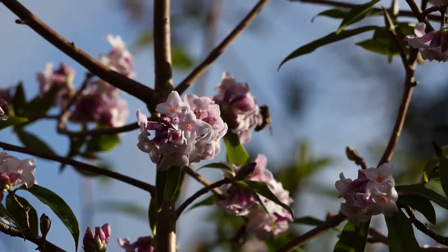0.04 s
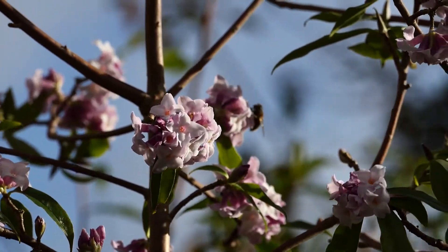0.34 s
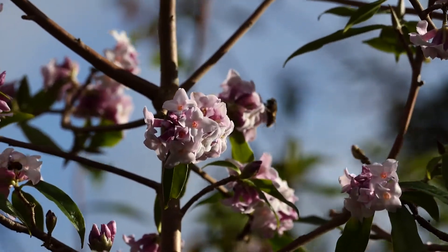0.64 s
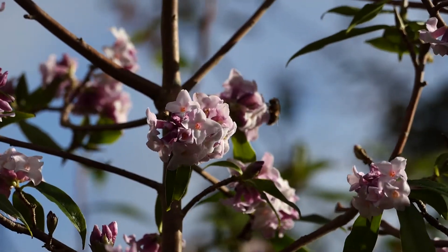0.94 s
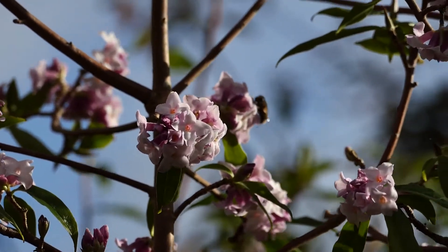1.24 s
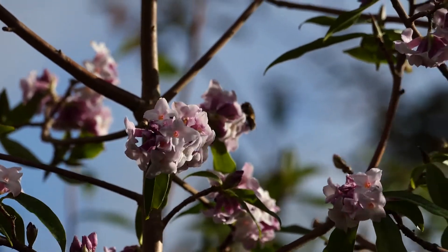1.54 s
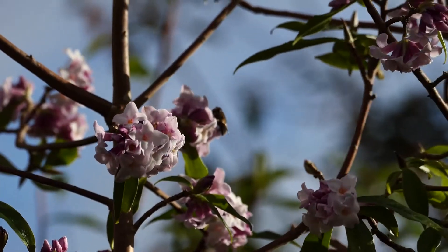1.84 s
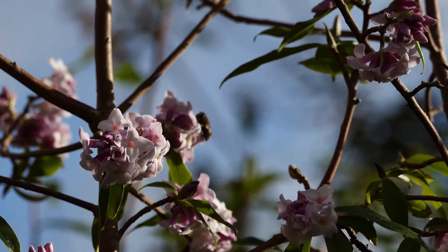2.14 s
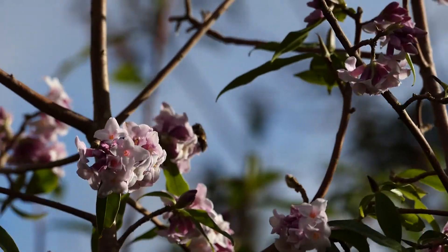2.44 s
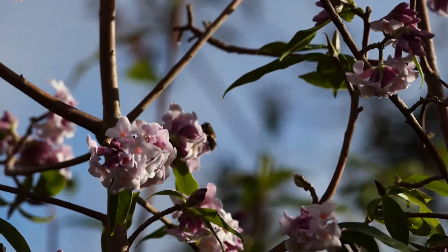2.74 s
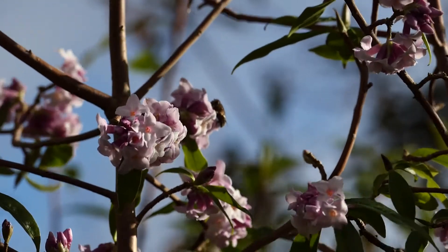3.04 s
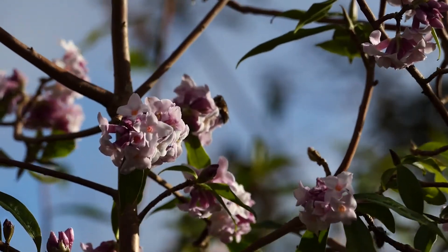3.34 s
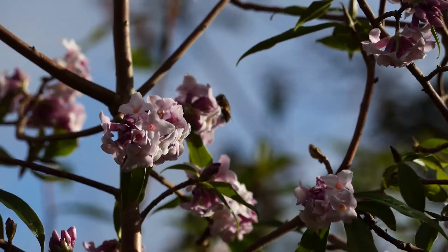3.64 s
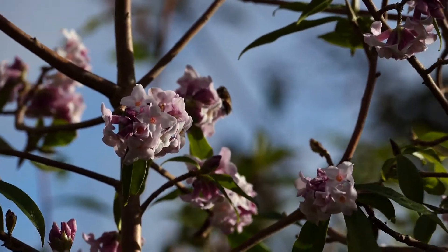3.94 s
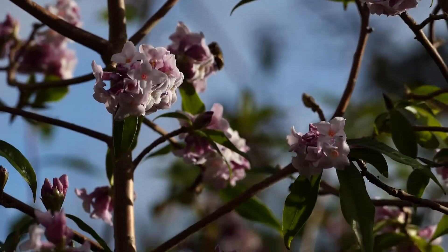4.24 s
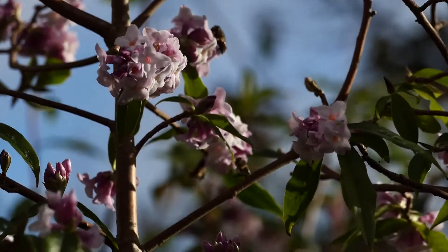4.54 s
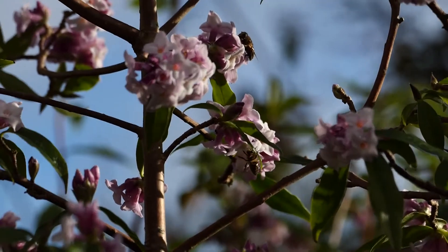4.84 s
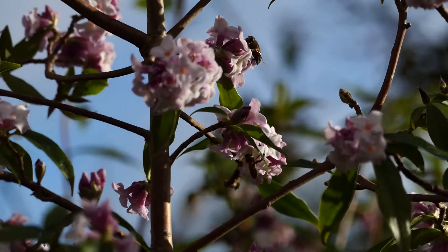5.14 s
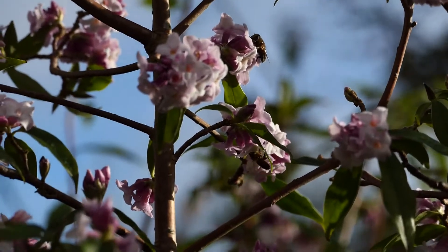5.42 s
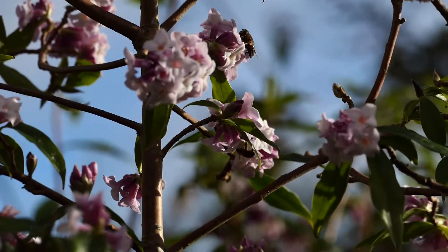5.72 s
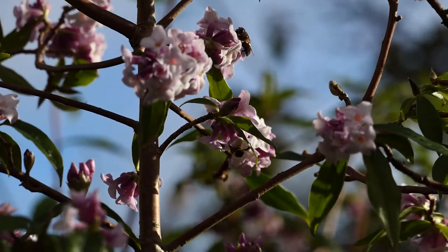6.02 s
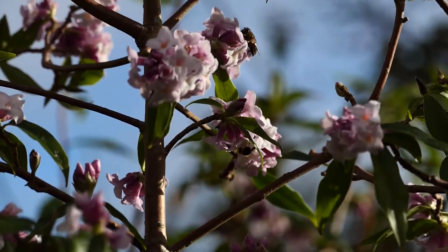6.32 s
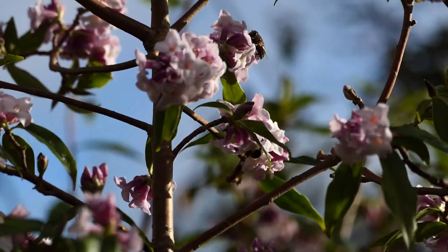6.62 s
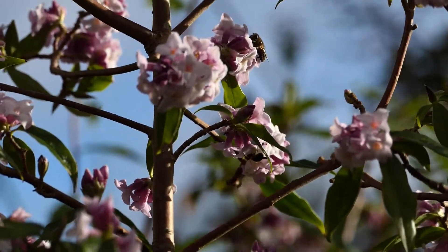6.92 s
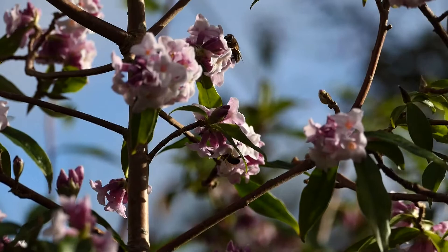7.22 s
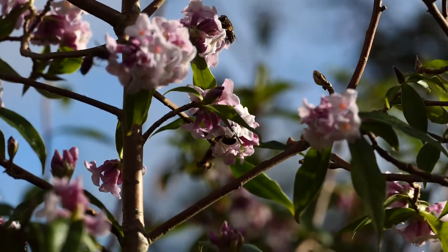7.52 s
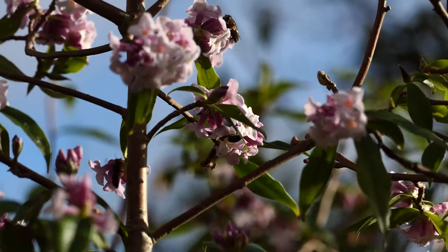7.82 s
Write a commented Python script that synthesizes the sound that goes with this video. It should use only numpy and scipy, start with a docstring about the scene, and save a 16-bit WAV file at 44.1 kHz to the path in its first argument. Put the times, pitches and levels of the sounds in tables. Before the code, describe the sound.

Strong gusts thump and rumble on the microphone in a garden for about two seconds, then drop to a light breeze. A bumblebee drones briefly past, and honeybees hum softly around a flowering shrub, single ones buzzing out of the hum. A small distant bird gives a short high chirp about every two seconds. Twigs tick faintly close by over a dull outdoor rush, and light wind bumps return near the end.

```python
"""Wind thumps on the microphone for the first two seconds, and the limiter ducks the whole garden under
the strongest gusts. As it drops to a breeze, honeybees are heard working a flowering shrub: many
wingbeats merge into a soft hum, single bees stand out of it and a bumblebee drones past.
A small bird repeats an arched two-voiced chirp; twigs tick and leaves brush faintly close by.
Behind it all lie the hiss of foliage and the far outdoor rush."""
import sys
import numpy as np
from scipy import signal
from scipy.fft import rfft, irfft, next_fast_len
from scipy.io import wavfile
from scipy.ndimage import uniform_filter1d, minimum_filter1d

SR = 44100
rng = np.random.default_rng(int(sys.argv[2]) if len(sys.argv) > 2 else 0)


def put_to_file(sound):
    """Save the sound as 16-bit audio at rate SR, in the file named by the first command-line argument."""
    columns = np.atleast_2d(sound).T  # one column per channel
    safe = np.clip(columns, -1, 1)
    whole_steps = np.round(safe * 32767)
    wavfile.write(sys.argv[1], SR, whole_steps.astype(np.int16))


N = 351477
TIME = np.arange(N) / SR


# hum from the shrub, as it reaches the microphone: (time [s], level [dB])
SWARM_LEVEL = [(0, -43), (.4, -42.5), (.9, -45), (1.85, -46), (2.05, -42), (2.6, -42), (3.1, -46),
               (3.55, -41), (4.7, -40.5), (5.45, -42), (7.97, -40.5)]
# how far the wingbeats in the shrub lie apart: (time [s], spread [share of the wingbeat])
WINGBEAT_SPREAD = [(0, .036), (4.7, .034), (6.5, .048)]
# tone of a honeybee's wing stroke: (harmonic [number], relative level [dB])
HONEYBEE_TONE = [(1, -2), (2, 1), (3, -6), (4, -11), (5, -9), (6, -11), (7, -13), (8, -22), (9, -23),
                 (10, -25.5)]

def honeybees(count=16, wingbeat_hz=243):
    """Each bee has its own wingbeat, which wanders as it manoeuvres; its buzz swells as it turns."""
    hum_db, = in_time(SWARM_LEVEL)
    spread, = in_time(WINGBEAT_SPREAD)
    hum = np.zeros(N)
    for own_offset in np.linspace(-1, 1, count):
        detune = .7 * own_offset + .7 * drift(1.5) + .45 * drift(10.01)
        hum += from_db(1.45 * drift(1.55)) * buzz(wingbeat_hz * (1 + spread * detune), HONEYBEE_TONE)
    return from_db(hum_db) * evened(rms_one(hum), seconds=.13)


# single bees and smaller, faster fliers hopping from flower to flower:
# (time [s], half length [s], wingbeat [Hz], level [dB], overtone boost [dB])
FLOWER_HOPS = [(2.1, .11, 334, -45.5, -14), (2.1, .09, 245, -47, 7), (2.496, .24, 242, -45.5, -4),
               (3.56, .12, 240, -46, 3), (4.048, .22, 246, -44.5, -3), (4.63, .1, 240, -42.5, 5),
               (4.947, .11, 242, -43, -3), (5.063, .055, 228, -45.5, 4), (5.7, .12, 249, -46, 0),
               (6.24, .26, 355, -47.5, -9), (6.618, .12, 254, -48, 0), (7.794, .088, 233, -43.5, 0)]
# their soft wing stroke: (harmonic [number], relative level [dB])
HOP_TONE = [(1, 0), (2, 0), (3, -19), (4, -19)]

def hopping_bees(wander=.012):
    """A bee lifts off, hums clear of the swarm and lands; some face the microphone and buzz brighter."""
    out = np.zeros(N)
    for s, half_length, beat_hz, level_db, overtones_db in FLOWER_HOPS:
        flight = from_db(level_db + 1.9 * drift(12)) * bell_curve(s, half_length)
        tone = [(k, db + overtones_db * (k > 1)) for k, db in HOP_TONE]
        out += flight * buzz(beat_hz * (1 + wander * drift(7.1)), tone)
    return out


# one bee swerving closer to the microphone: (time [s], wingbeat [Hz], level [dB])
NEAR_BEE_FLIGHT = [(2.6, 280.5, -56), (2.82, 284.4, -41.5), (3.2, 258, -50), (3.6, 242.8, -41),
                   (4.4, 240, -55), (5.4, 237.2, -60), (5.6, 240, -75)]
# its raspier wing stroke at close range: (harmonic [number], relative level [dB])
NEAR_BEE_TONE = [(1, -10), (2, -5), (3, -4), (4, -7), (5, -10), (6, -14), (7, -26.5), (8, -19)]

def near_bee(flutter=.045):
    """Its wings flutter as it steers, race in the swerve, then settle to the pace of the others."""
    beat_hz, level_db = in_time(NEAR_BEE_FLIGHT)
    gain = from_db(level_db + 2.1 * drift(7.3))
    return gain * buzz(beat_hz * (1 + flutter * drift(25)), NEAR_BEE_TONE)


# a bumblebee droning past the microphone: (time [s], wingbeat [Hz], level [dB])
BUMBLEBEE_FLIGHT = [(1.87, 146.4, -57), (2.0, 148.6, -37.5), (2.12, 146.2, -38.5), (2.2, 152, -51),
                    (2.4, 160, -79)]
# its rounder wing stroke: (harmonic [number], relative level [dB])
BUMBLEBEE_TONE = [(1, 1), (2, -16), (3, -15)]

def bumblebee(wander=.0276):
    """A heavier body beats its wings more slowly."""
    beat_hz, level_db = in_time(BUMBLEBEE_FLIGHT)
    gain = from_db(level_db + 2.8 * drift(33))
    return gain * buzz(beat_hz * (1 + wander * drift(17)), BUMBLEBEE_TONE)


def buzz(beat_hz, tone):
    """One wing stroke repeated at the wingbeat rate; rms 1."""
    cycle = np.linspace(0, 1, 513)
    stroke = sum(from_db(db) * np.sin(2 * np.pi * (k * cycle + rng.random())) for k, db in tone)
    return np.interp(np.cumsum(beat_hz) / SR % 1, cycle, rms_one(stroke))


# wind right on the microphone, strong at first, then a light breeze: (time [s], strength [dB])
WIND_STRENGTH = [(0, -14), (.42, -14), (.6, -13), (.9, -13), (1.1, -18), (1.3, -13), (1.48, -22),
                 (1.62, -24), (1.98, -23.5), (2.1, -31.5), (2.6, -42.5), (4.9, -48), (5.65, -33),
                 (6.15, -40), (7.15, -35.5), (7.5, -29.5), (7.9, -28.5)]
# large, middling and small eddies at its ports: (frequency [Hz], relative density [dB])
LARGE_EDDIES = [(12, 12.5), (22, 13.5), (35, 11.5), (50, -12), (65, -6)]
MIDDLING_EDDIES = [(35, -18), (58, 4), (75, -2.5), (100, -8.5), (135, -23)]
SMALL_EDDIES = [(80, -14.5), (120, 6.5), (165, -2.5), (240, -13), (400, -21.5)]

def wind():
    """One wind drives all eddies: large ones thump on both ports alike, small ones flutter a bit apart."""
    wind_db, = in_time(WIND_STRENGTH)
    thumps = from_db(wind_db + 2) * evened(noise(LARGE_EDDIES), seconds=.041)
    rumble = from_db(1.056 * wind_db - 5) * evened(noise(MIDDLING_EDDIES), seconds=.045)
    flutter = from_db(.86 * wind_db - 23.5) * evened(wide_noise(SMALL_EDDIES), seconds=.17)
    return thumps + rumble + flutter


# single gusts striking the microphone, ahead of the limiter:
# (time [s], swirl peak [dB], build-up [s], swirl rate [Hz], flutter level [dB])
MIC_GUSTS = [(.048, 0, .024, 33, -28), (.23, -12, .028, 24, -25), (.41, -7, .015, 48, -31),
             (.466, -3, .022, 23, -24), (.513, 10.5, .02, 21, -29), (.64, -12, .02, 50, -27),
             (.755, -9, .022, 42, -21), (.853, 9, .018, 24, -28), (.945, -7, .028, 55, -12.5),
             (.99, 8, .015, 32, -17), (1.29, -10, .055, 55, -20), (1.368, -5, .022, 42, -18.5),
             (1.408, 5, .013, 25, -28), (1.55, -22, .018, 65, -31), (1.73, -23, .026, 62, -26),
             (1.815, -21, .022, 55, -28), (1.96, -20, .045, 40, -45), (2.74, -30, .026, 38, -50),
             (4.6, -31, .06, 17, -52), (5.0, -34, .035, 25, -54), (5.62, -27, .04, 35, -46),
             (5.76, -25, .035, 30, -48), (6.31, -27, .04, 24, -48), (6.68, -17.5, .036, 31, -38),
             (6.835, -25, .025, 33, -46), (7.03, -26, .04, 26, -48), (7.5, -24, .05, 30, -42),
             (7.79, -21.5, .05, 36, -36)]
# the flutter they shed at the ports: (frequency [Hz], relative density [dB])
GUST_SPECTRUM = [(85, 5.5), (125, 4.5), (200, -6.5), (290, -19.5), (450, -28)]

def gusts(wander=.3, fall_share=.55):
    """A gust is one big swirl that builds up, shedding flutter, and collapses after its hardest push."""
    out = np.zeros((2, N))
    flutter = evened(wide_noise(GUST_SPECTRUM), seconds=.041)
    swirl_time = np.cumsum(1 + wander * drift(21)) / SR  # an uneven clock makes the swirl waver
    for s, peak_db, build_up, hz, flutter_db in MIC_GUSTS:
        swirl = np.cos(2 * np.pi * hz * (swirl_time - np.interp(s, TIME, swirl_time)))
        half_length = build_up * np.where(TIME < s, 1, fall_share)
        out += bell_curve(s, half_length) * (from_db(peak_db) * swirl + from_db(flutter_db) * flutter)
    return out


# a small bird heard through the foliage: (time of the arch's top [s], upper voice top [Hz],
# main voice top [Hz], stretch [factor], upper voice stress on rise [dB], on fall [dB],
# main voice stress on rise [dB], at top [dB], on fall [dB])
BIRD_CHIRPS = [(.346, 4550, 4450, 1.1, -45.5, -51, -45, -57, -41.5),
               (1.966, 4620, 4230, .85, -47, -45.5, -43, -39, -38),
               (3.783, 4480, 4330, .95, -43.5, -40.5, -48.5, -36, -39.5),
               (5.804, 4720, 4400, .95, -45.5, -45, -46.5, -50, -35.5),
               (7.778, 4580, 4350, .9, -47.5, -70, -54, -66, -44.5)]
# the two sides of its syrinx: (unstretched time from top [s], pitch [share of top], relative level [dB])
MAIN_ARCH = [(-.065, .69, -6), (-.036, .75, -1), (-.027, .79, -3), (-.016, .9, 0), (-.004, 1, 0),
             (.008, 1, 0), (.02, .93, 0), (.032, .83, -1), (.044, .79, -12)]
UPPER_ARCH = [(-.07, .71, -12), (-.054, .78, -3), (-.032, .9, 0), (-.018, .96, -3), (-.002, 1, -1),
              (.012, .99, -1), (.028, .92, -3), (.046, .8, -8)]

def bird(quaver=.011, flank_s=.02):
    """Two near-sine voices arch up and over, stressed anew in each call; foliage scatters a tail."""
    song = np.zeros(N)
    for s, upper_hz, main_hz, stretch, *stresses in BIRD_CHIRPS:
        from_top = (TIME - s) / stretch
        voices = (MAIN_ARCH, main_hz, stresses[2:]), (UPPER_ARCH, upper_hz, stresses[:2])
        for arch, top_hz, stress_db in voices:
            on = (from_top > arch[0][0]) & (from_top < arch[-1][0])
            pitch_share, arch_db = in_time(arch, from_top[on])
            stress_times = np.linspace(-flank_s, flank_s, len(stress_db))
            level_db = arch_db + np.interp(from_top[on], stress_times, stress_db)
            pitch_hz = top_hz * pitch_share * (1 + quaver * drift(200)[on])
            song[on] += from_db(level_db) * np.sin(2 * np.pi * np.cumsum(pitch_hz) / SR)
    song *= from_db(2.5 * drift(120) - 1.5)  # the level flickers
    return song + scattered(song, t60=.04, level_db=-8) + scattered(song, t60=.45, level_db=-7)


# twigs ticking close to the microphone: (time [s], strength [dB], relative body [dB], slips [count])
TWIG_TICKS = [(3.282, -23.5, -4, 3), (3.625, -30, -6, 2), (4.0921, -34, 2, 2), (4.2028, -29, -8, 3),
              (4.2617, -28, 2, 5), (4.44, -30, -6, 5), (4.7965, -30, 18, 4), (5.1885, -24, 7, 5),
              (5.876, -35, 11, 4), (5.9948, -31, -2, 2), (6.2078, -22.5, -3, 5), (6.53, -33, 4, 2),
              (6.6745, -27, 9, 2), (7.0159, -21, -12, 4)]
# the bright ring of a twig: (frequency [Hz], width [Hz], gain [dB])
TWIG_MODES = [(6500, 2500, -3), (9000, 3000, -1), (13000, 5000, 0)]

def twigs(slip_gap_s=.0044, crackles_per_s=18):
    """Each tick is a short run of slips, strongest in the middle, ringing briefly in the twig."""
    slips, body = np.zeros(N), np.zeros(N)
    for s, strength_db, body_db, count in TWIG_TICKS:
        order = np.arange(int(count))
        jitter = rng.uniform(-.15, .15, len(order))
        at = ((s + slip_gap_s * (order + jitter)) * SR).astype(int)
        arch = np.sqrt(np.sin(np.pi * (order + .5) / count))
        sizes = from_db(strength_db) * arch * rng.choice([-1, 1], len(order))
        slips[at] += sizes
        body[at] += sizes * from_db(body_db)
    # faint crackle of leaves in between
    slips += (rng.random(N) < crackles_per_s / SR) * from_db(-40 + 2 * rng.standard_normal(N))
    ring = sum(from_db(db) * resonance(slips, hz, width) for hz, width, db in TWIG_MODES)
    ticks = ring + resonance(body, hz=3700, width_hz=2800)
    return ticks + scattered(ticks, t60=.03, level_db=-6)


# leaves brushing close by: (time [s], level [dB], half length [s], centre frequency [Hz])
LEAF_BRUSHES = [(0.698, -53, 0.014, 10500), (1.992, -47, 0.066, 2350), (4.273, -52, .008, 13130),
                (4.302, -58, 0.055, 10000), (5.89, -51.5, 0.014, 5140), (5.986, -55, 0.024, 8000),
                (6.11, -53, 0.012, 7460), (6.23, -46, 0.003, 8500), (7.266, -49, 0.0071, 8600),
                (7.65, -57, 0.027, 9900)]

def leaves(grains_per_s=4000):
    """Leaves slide over each other in short grainy swishes."""
    out = np.zeros(N)
    grains = rng.standard_normal(N) * (rng.random(N) < grains_per_s / SR)
    for s, level_db, half_length, hz in LEAF_BRUSHES:
        out += from_db(level_db) * bell_curve(s, half_length) * rms_one(resonance(grains, hz, .5 * hz))
    return out


# the far outdoor rush, and a low far rumble that swells late: (time [s], level [dB])
FAR_RUSH_LEVEL = [(0, -31.5), (.12, -39), (1, -41), (2, -38.5), (3.6, -36.5), (6.6, -37), (7.97, -35.5)]
FAR_RUMBLE_LEVEL = [(0, -57.5), (5, -58), (6, -42), (6.7, -45.5), (7.3, -40), (7.97, -49)]
# rush, rumble and foliage as heard from the shrub: (frequency [Hz], relative density [dB])
FAR_RUSH_SPECTRUM = [(30, 8), (70, 4.5), (110, 5.5), (190, 0.5), (300, 0.5), (600, 0.5), (900, -1),
                     (1200, -2.5), (1600, -7.5), (2100, -11.5), (3000, -17.5), (4200, -22.5), (6000, -34.5),
                     (15000, -84)]
FAR_RUMBLE_SPECTRUM = [(100, -25.5), (185, -0.5), (270, -13), (360, -7.5), (550, -6)]
FOLIAGE_SPECTRUM = [(1500, 5.5), (3500, 4.5), (5500, 4), (8500, 2.5), (11000, -0.5), (15500, -1)]

def garden_air(stir_start_s=4.07, stir_end_s=5.39, stir_fade_s=.21):
    """A dull far rush gains body; foliage hisses finely, more strongly while the shrub is stirred."""
    rush_db, = in_time(FAR_RUSH_LEVEL)
    rumble_db, = in_time(FAR_RUMBLE_LEVEL)
    rush = from_db(rush_db + .4 * drift(1.2)) * noise(FAR_RUSH_SPECTRUM)
    rumble = from_db(rumble_db) * noise(FAR_RUMBLE_SPECTRUM)
    resting = from_db(-54 + rush_db - rush_db.mean())  # foliage at rest follows the rush
    inside_stir_s = np.minimum(TIME - stir_start_s, stir_end_s - TIME)
    stirred = from_db(-52.5) * np.clip(inside_stir_s / stir_fade_s + .5, 0, 1)
    foliage = np.hypot(resting, stirred) * from_db(.5 * drift(17)) * noise(FOLIAGE_SPECTRUM)
    return rush + rumble + foliage


# the microphone's own noise floor: (frequency [Hz], relative density [dB])
MIC_SPECTRUM = [(2500, -45), (4500, -22), (6000, -9), (8000, -3), (11000, 0), (15500, 0)]

def mic_hiss(level_db=-68.5):
    """Each channel adds a faint, high hiss of its own."""
    return from_db(level_db) * np.array([noise(MIC_SPECTRUM), noise(MIC_SPECTRUM)])


def from_db(db):
    """Decibels to gain."""
    return 10 ** (np.asarray(db) / 20)


def rms_one(x):
    """Scale to an rms of 1."""
    return x / np.sqrt(np.mean(x ** 2) + 1e-20)


def in_time(rows, at=TIME):
    """The columns of a curve table, joined by straight lines."""
    s, *columns = np.transpose(rows)
    return [np.interp(at, s, c) for c in columns]


def bell_curve(peak_s, half_length_s):
    """A Gaussian rise and fall with a peak of 1."""
    return np.exp(-.5 * ((TIME - peak_s) / half_length_s) ** 2)


def drift(rate_hz):
    """Smooth random wandering with a spread of 1."""
    step, run_in = 100, 2000
    pole = np.exp(-2 * np.pi * rate_hz * step / SR)
    kicks = rng.standard_normal(N // step + run_in + 2)
    slow = signal.lfilter([1], [1, -2 * pole, pole * pole], kicks)[run_in:]
    return np.interp(np.arange(N) / step, np.arange(len(slow)), rms_one(slow))


def noise(spectrum):
    """Noise of a given colour, rms 1; it falls steeply above the last point and is empty below 10 Hz."""
    size = next_fast_len(N)
    hz = np.maximum(np.fft.rfftfreq(size, 1 / SR), 1)
    points_hz, level_db = np.transpose(spectrum)
    skirt = np.minimum(points_hz[-1] / hz, 1) ** 4 * (hz > 10)
    gain = from_db(np.interp(np.log(hz), np.log(points_hz), level_db)) * skirt
    return rms_one(irfft(rfft(rng.standard_normal(size)) * gain, size)[:N])


def wide_noise(spectrum, likeness=.984):
    """Noise that is nearly, but not quite, the same at both microphone ports."""
    mid = np.sqrt((1 + likeness) / 2) * noise(spectrum)
    side = np.sqrt((1 - likeness) / 2) * noise(spectrum)
    return mid + side * [[1], [-1]]


def evened(x, seconds):
    """Take the slow swells out of a sound."""
    return x / np.sqrt(uniform_filter1d(x ** 2, int(seconds * SR)) + 1e-6)


def resonance(x, hz, width_hz):
    """One resonance with a gain of 1 on top."""
    r = np.exp(-np.pi * width_hz / SR)
    feedback = [1, -2 * r * np.cos(2 * np.pi * hz / SR), r * r]
    return signal.lfilter(np.array([1, 0, -1]) * (1 - r * r) / 2, feedback, x + 1e-18)


def scattered(x, t60, level_db):
    """A dying spray of small echoes."""
    age = TIME[:SR // 2]
    echoes = rng.standard_normal(len(age)) * from_db(-60 * age / t60)
    return from_db(level_db) * signal.fftconvolve(x, echoes / np.linalg.norm(echoes))[:N]


def released(cut_db, seconds):
    """Each cut in gain dies away exponentially, unless a deeper one follows."""
    recovery = np.exp(-TIME / seconds)
    return recovery * np.maximum.accumulate(cut_db / recovery)


def limiter(x, ceiling_db=-1.5, attack_s=.014, held_share=.48):
    """Peaks over the ceiling push the whole sound down; the gain springs partway back, then creeps."""
    peak_db = 20 * np.log10(np.abs(x).max(axis=0) + 1e-9)
    over_db = np.maximum(peak_db - ceiling_db, 0)
    cut_db = np.maximum(released(over_db, seconds=.1), released(held_share * over_db, seconds=.81))
    span = int(attack_s * SR)
    return x * from_db(uniform_filter1d(minimum_filter1d(-cut_db, span), span))


def scene():
    """The garden lies in the middle; the wind presses a little harder on the right of the microphone."""
    garden = garden_air() + honeybees() + hopping_bees() + near_bee() + bumblebee()
    garden += bird() + twigs() + leaves()
    return garden + mic_hiss() + (wind() + gusts()) * from_db([[-.2], [.2]])


def record(dry, edge_s=.005, cutoff_hz=15700):
    """The limiter holds down the strongest thumps; both ends fade briefly and the top treble is cut."""
    from_edge_s = np.minimum(TIME, TIME[::-1])
    fade = np.sin(np.pi / 2 * np.minimum(from_edge_s / edge_s, 1)) ** 2
    lowpass = signal.ellip(12, .1, 90, cutoff_hz, fs=SR, output="sos")
    return signal.sosfilt(lowpass, fade * limiter(dry))


dry = scene()
out = record(dry)
put_to_file(out)
```